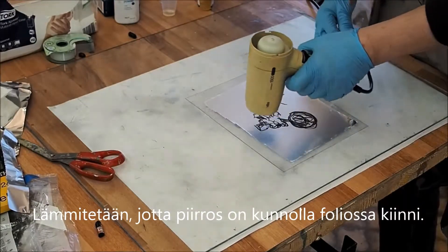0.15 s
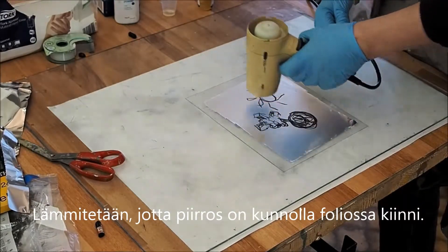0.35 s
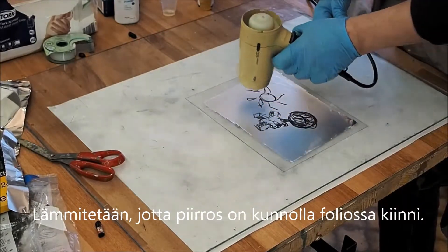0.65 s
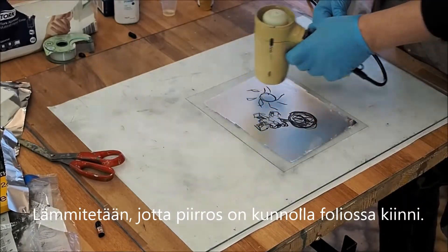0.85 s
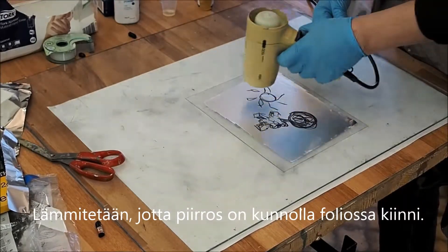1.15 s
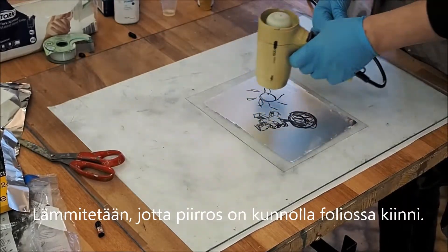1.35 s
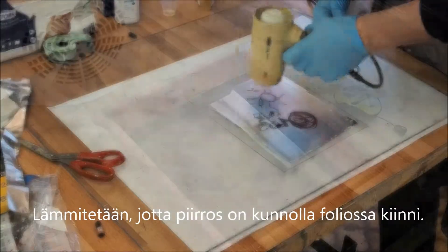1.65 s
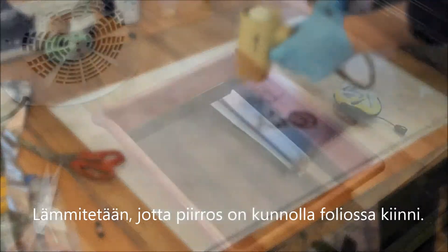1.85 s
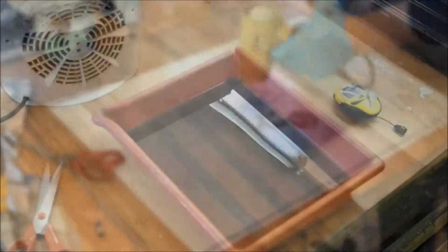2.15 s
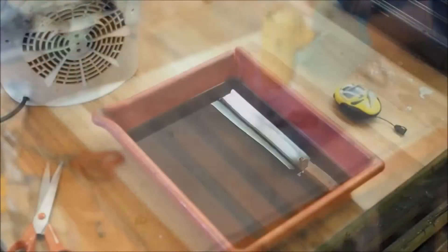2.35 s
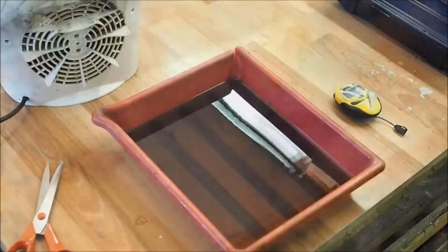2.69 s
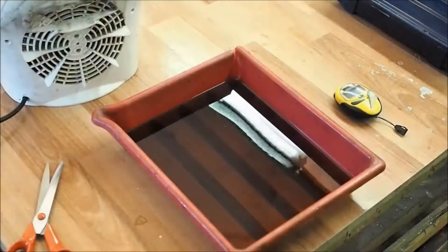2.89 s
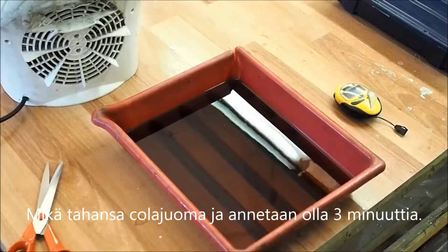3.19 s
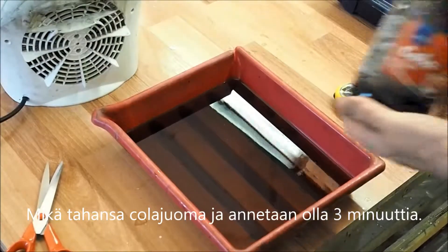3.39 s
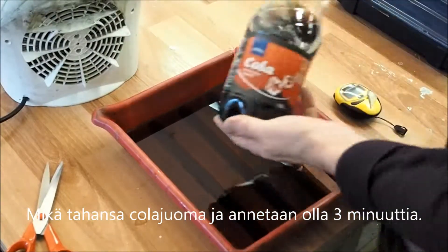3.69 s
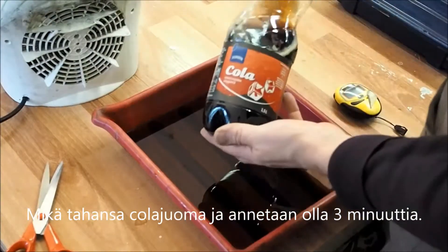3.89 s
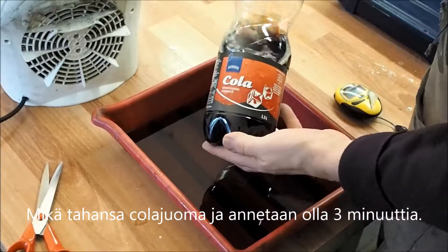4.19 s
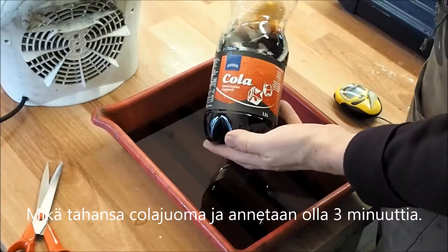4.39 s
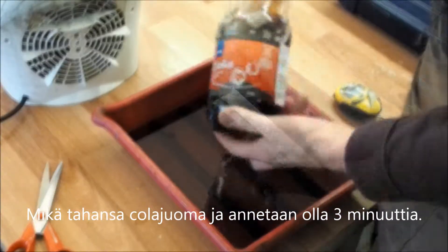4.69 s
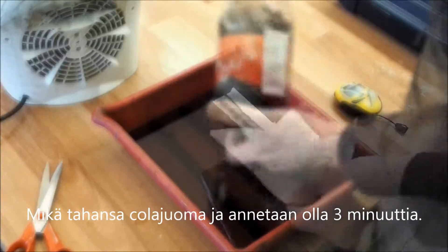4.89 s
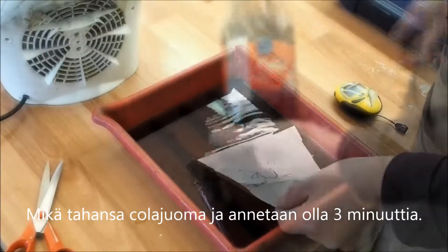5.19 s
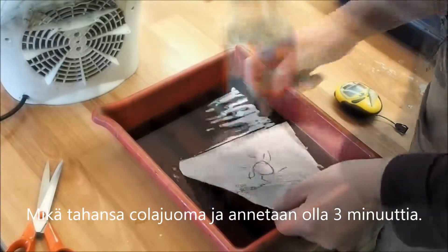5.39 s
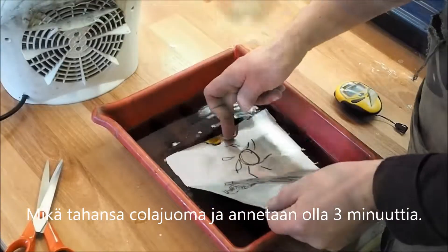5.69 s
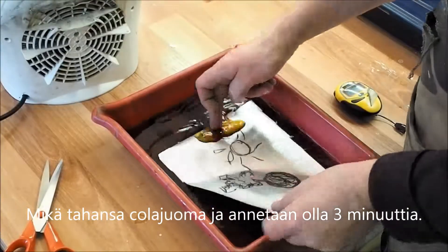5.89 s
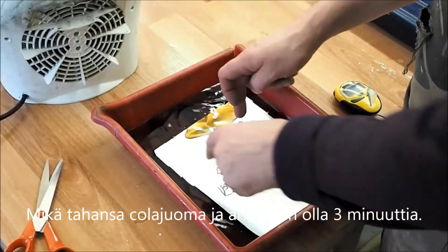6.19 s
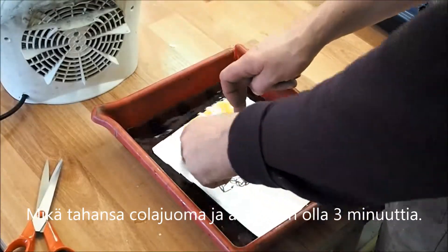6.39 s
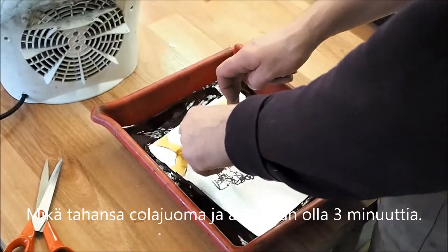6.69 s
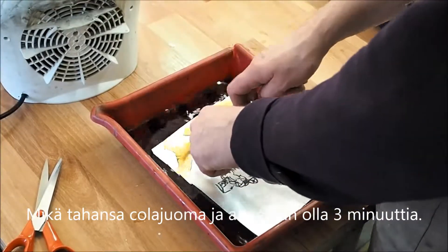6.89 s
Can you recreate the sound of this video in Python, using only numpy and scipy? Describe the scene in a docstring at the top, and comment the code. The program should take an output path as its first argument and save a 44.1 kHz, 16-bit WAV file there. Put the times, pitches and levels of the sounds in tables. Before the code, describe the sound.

Rushing hot air and fan whine fade away over three seconds, leaving quiet workshop handling: sleeve swish, bottle knock, tray taps and crackling foil.

```python
"""A rush of air with a fan whine: a small hair dryer is waved over foil on a workbench and fades away.
Then a plastic bottle is brought over a shallow tray with a swish of sleeve and put down, and the foil is
pushed into the liquid: soft bumps, a few knocks and thin crinkles in a small workshop.
Air, cloth, foil and room are coloured noise; the seven-blade fan is a set of lines locked to its shaft.
Knocks are ringing modes with a short noisy crack, and bumps are short bursts of filtered noise."""
import sys
import numpy as np
from scipy import signal
from scipy.fft import rfft, irfft
from scipy.io import wavfile

SR = 44100
rng = np.random.default_rng(int(sys.argv[2]) if len(sys.argv) > 2 else 0)


def log_audio(samples):
    """Write samples as a 16-bit WAV file to the path given in sys.argv[1]."""
    # one column per channel
    frames = np.atleast_2d(samples).T
    # limit to full scale, then quantise
    limited = np.clip(frames, -1, 1)
    pcm = np.round(limited * 32767).astype(np.int16)
    wavfile.write(sys.argv[1], SR, pcm)


N = 310905                                              # length in samples, about 7 s
TIME = np.arange(N) / SR                                # seconds
BINS = np.maximum(np.arange(N // 2 + 1) * SR / N, 1)    # spectrum frequencies in Hz, kept above zero

# Table levels are in dB; some functions add an overall level on top.


def from_db(db):
    """Turn decibels into a gain."""
    return 10 ** (np.asarray(db) / 20)


def rms_one(x):
    """Scale a signal to unit power."""
    return x / np.sqrt(np.mean(x ** 2) + 1e-20)


def in_time(rows):
    """Draw each column of a time table as a curve, with a value at every sample."""
    seconds, *columns = np.transpose(rows)
    return [np.interp(TIME, seconds, column) for column in columns]


def during(rows, fade):
    """One while a time table lasts, fading to zero outside it."""
    first, last = rows[0][0], rows[-1][0]
    return np.interp(TIME, [first - fade, first, last, last + fade], [0, 1, 1, 0])


def over_hz(points):
    """Draw a frequency table as a curve in dB, straight between points on a log frequency scale."""
    hz, db = np.transpose(points)
    return np.interp(np.log(BINS), np.log(hz), db)


def low_part(x, hz, order):
    """Keep what lies below a frequency, with a smooth edge."""
    return irfft(rfft(x) / (1 + (BINS / hz) ** order), N)


def drift(rate):
    """Random wandering with spread one; the rate in Hz sets how fast it wanders."""
    return rms_one(low_part(rng.standard_normal(N), rate, order=4))


def stereo_noise(colour_db, width, grain_db=0):
    """Coloured left and right noise with a unit-power middle; grain makes the noise's strength uneven."""
    sizes = from_db(grain_db * drift(580))
    white = rng.standard_normal((2, N)) * sizes
    colours = from_db([colour_db, colour_db + over_hz(width)])
    mid, side = irfft(rfft(white) * colours, N)
    return np.array([mid + side, mid - side]) / np.std(mid)


def decay(start, t60, rise):
    """A quick rise and an exponential fall that drops 60 dB in t60 seconds."""
    age = np.maximum(TIME - start, 0)
    return (1 - np.exp(-age / rise)) * from_db(-60 * np.minimum(age / t60, 4))


def ring(clicks, hz, t60):
    """A damped resonance: a unit click sets a fading sine ringing from height one."""
    radius = from_db(-60 / (t60 * SR))
    turn = 2 * np.pi * hz / SR
    feedback = [1, -2 * radius * np.cos(turn), radius * radius]
    return signal.lfilter([0, np.sin(turn)], feedback, clicks + 1e-18)


def strokes(rows, range_db=20):
    """Each stroke swells and dies evenly in dB, by range_db per rise or fall time; overlaps add in power."""
    power = np.zeros(N)
    for peak_s, db, rise, fall in rows:
        away = np.maximum((peak_s - TIME) / rise, (TIME - peak_s) / fall)
        power += from_db(db - range_db * np.minimum(away, 10)) ** 2
    return np.sqrt(power)


def placed(x, lag_s):
    """A source off to one side reaches the right channel a moment before the left."""
    half_turns = np.pi * BINS * lag_s * np.array([[-1], [1]])
    return irfft(rfft(x) * np.exp(1j * half_turns), N)


# How the workshop background rises under the fading dryer, then drops to a quieter room.
# Each row: time in seconds, rumble level in dB, hiss level in dB.
BACKGROUND_LEVELS = [(0, -76, -69), (1.6, -62, -65.5), (2.9, -48, -55), (3.95, -48.5, -53.5),
                     (4.4, -49, -58.5), (5.0, -49.5, -54), (5.28, -56, -64), (6.35, -57, -63),
                     (7.05, -54, -64.5)]
# Colour of the low room rumble. Each row: frequency in Hz, strength in dB per Hz.
RUMBLE_COLOUR = [(15, -40), (25, -14.5), (75, -3), (261, -2.5), (321, -4.5), (444, -8), (659, -6.5),
                 (796, -12.5), (994, -9.5), (1160, -17.5), (1310, -16.5), (1400, -44), (1500, -33),
                 (1950, -60), (3300, -120)]
# Colour of the room hiss. Each row: frequency in Hz, strength in dB per Hz.
HISS_COLOUR = [(700, -32), (1300, -12), (1700, 0), (2100, -6.5), (3600, -7), (4700, -12), (5500, -15),
               (10300, -15), (13000, -25), (16000, -30)]
# Stereo width of the room. Each row: frequency in Hz, side against middle in dB.
ROOM_STEREO = [(60, -5.5), (150, -6), (380, -8), (700, -6), (1300, -7), (2400, -4), (4400, -1.5),
               (8000, 1.5), (15000, -1)]


def background(rumble_db=-1.0, hiss_db=-0.5):
    """Room air as two layers of coloured noise, a low rumble and a faint hiss, each following its curve."""
    rumble, hiss = in_time(BACKGROUND_LEVELS)
    low = from_db(rumble + rumble_db) * stereo_noise(over_hz(RUMBLE_COLOUR), ROOM_STEREO)
    high = from_db(hiss + hiss_db) * stereo_noise(over_hz(HISS_COLOUR), ROOM_STEREO)
    return low + high


def workshop(x, t60, wall_hz, spread):
    """Diffuse reflections as a dying noise tail, dulled by the walls and mostly alike on both sides."""
    age = TIME[:SR // 2]
    after_gap = age > .003    # the first reflections come 3 ms late
    mid, side = rng.standard_normal((2, len(age))) * from_db(-60 * age / t60) * after_gap
    dulling = signal.butter(1, wall_hz, fs=SR, output="sos")
    tail = signal.sosfilt(dulling, [mid + spread * side, mid - spread * side])
    tail /= np.sqrt(np.sum(tail[0] ** 2))
    return signal.fftconvolve(x[None], tail, axes=1)[:, :N]


# Soft bumps on the bench.
# Each row: start in seconds, level in dB, centre in Hz, time to fall by 60 dB in seconds.
SOFT_BUMPS = [(1.993, -30.5, 133, 0.07), (2.691, -39.5, 516, 0.11), (2.835, -34.5, 660, 0.12),
              (2.84, -48, 280, 0.12), (3.06, -37.5, 527, 0.091), (3.105, -37, 442, 0.064),
              (3.111, -42, 159, 0.34), (3.1385, -40.5, 2100, 0.061), (3.14, -45, 650, 0.12),
              (3.355, -41, 216, 0.077), (3.43, -40, 110, 0.11), (3.514, -51, 204, 0.072),
              (4.627, -45, 402, 0.092), (4.863, -41, 175, 0.25), (4.864, -43.5, 640, .15),
              (4.922, -43, 153, 0.22), (5.49, -47.5, 910, .06), (5.542, -36.5, 320, 0.11),
              (5.593, -42, 2300, 0.067), (6.187, -48, 2600, .12), (6.228, -45.5, 272, 0.069)]


def bumps(width_ratio=1.37, rise=0.00085):
    """Soft contacts stir many damped modes around one pitch, made as short bursts of band-filtered noise."""
    out = np.zeros(N)
    for start, db, hz, t60 in SOFT_BUMPS:
        band = signal.butter(2, [hz / width_ratio, hz * width_ratio], "band", fs=SR, output="sos")
        shape = decay(start, t60, rise)
        thud = signal.sosfilt(band, rng.standard_normal(N) * shape + 1e-18)
        # the filtered thud gets back the power of its shape
        out += from_db(db) * rms_one(thud) * np.sqrt(np.mean(shape ** 2))
    return out


def knocks(hits, modes, crack_db, crack_t60, crack_hz, low_hz=300):
    """Each blow rings the body's modes and starts with a short noisy crack from low_hz to crack_hz."""
    clicks, burst = np.zeros(N), np.zeros(N)
    for start, db in hits:
        clicks[round(start * SR)] = from_db(db)
        burst += from_db(db + crack_db) * decay(start, crack_t60, rise=.0001)
    band = signal.butter(2, [low_hz, crack_hz], "band", fs=SR, output="sos")
    out = signal.sosfilt(band, burst * rng.standard_normal(N) + 1e-18)
    for k, (hz, db, t60) in enumerate(modes):
        sign = (-1) ** k    # neighbouring modes start in opposite directions
        out += sign * from_db(db) * ring(clicks, hz, t60)
    return out


# Taps on the bottle. Each row: start in seconds, level in dB.
TAPS_ON_BOTTLE = [(3.2991, -26.5), (3.3043, -36)]
# How the bottle rings. Each row: frequency in Hz, level in dB, time to fall by 60 dB in seconds.
BOTTLE_MODES = [(297.6, -12, 0.065), (570, -1.5, 0.041), (730, 2.5, 0.022), (990, -5, 0.035),
                (1450, -4, 0.013), (1940, -3, 0.017), (2200, -7, 0.018), (2800, -0.5, 0.019),
                (3380, -8, .025), (3680, -16, .02), (4900, -24, .015)]


def bottle_taps():
    """A tap on the plastic bottle rings its short-lived modes."""
    hit = knocks(TAPS_ON_BOTTLE, BOTTLE_MODES, crack_db=0, crack_t60=0.032, crack_hz=3000)
    return placed(hit, lag_s=.00002)


# The bottle set down on the bench. Each row: start in seconds, level in dB.
KNOCKS_ON_BENCH = [(4.919, -25), (4.9218, -40), (4.9255, -39)]
# How the bench rings. Each row: frequency in Hz, level in dB, time to fall by 60 dB in seconds.
BENCH_MODES = [(194, -7, 0.16), (260, -7, 0.069), (415, -7.5, 0.05), (625, 1, 0.04), (825, -1.5, 0.055),
               (1030, -18, 0.051), (1300, -3, 0.076), (1670, -8, 0.039), (2180, -6.5, 0.028),
               (2770, -6, .028), (4320, -10, 0.024), (6450, -9, 0.014), (7600, -4, 0.011), (9500, 4, 0.01),
               (10800, -7, .018)]


def bench_knocks():
    """The bottle's landing rings the bench, with a bright crack of contact."""
    hit = knocks(KNOCKS_ON_BENCH, BENCH_MODES, crack_db=2, crack_t60=0.021, crack_hz=12000)
    return placed(hit, lag_s=.000012)


# The tray nudged. Each row: start in seconds, level in dB.
KNOCKS_ON_TRAY = [(5.539, -30.5), (5.5455, -39.5), (5.5925, -41), (5.5962, -57), (5.604, -43.5)]
# How the tray rings. Each row: frequency in Hz, level in dB, time to fall by 60 dB in seconds.
TRAY_MODES = [(162, -10.5, 0.12), (306, -5.5, 0.042), (475, -2.5, .06), (573, -2, 0.051), (808, 3.5, 0.044),
              (910, 7.5, 0.032), (1096, 0, 0.042), (1450, -28, 0.035), (2160, -3.5, 0.021),
              (2880, -23, .03), (3760, -10, .025)]


def tray_knocks():
    """Nudges ring the tray, with a dull crack of contact."""
    hit = knocks(KNOCKS_ON_TRAY, TRAY_MODES, crack_db=8.5, crack_t60=0.041, crack_hz=1800)
    return placed(hit, lag_s=.000012)


# Fingers and sleeve rubbing at the tray.
# Each row: peak in seconds, level in dB, rise in seconds, fall in seconds.
TRAY_RUBS = [(3.22, -53.5, .17, .18), (4.63, -54, 0.066, 0.14), (4.97, -57.5, .2, .25),
             (5.6, -48.5, .04, 0.14), (5.78, -55, 0.087, 0.28), (5.87, -55.5, .05, 0.2),
             (6.05, -57, 0.16, 0.16), (6.2, -53, .05, 0.26), (6.6, -51.5, 0.13, 0.52),
             (7.04, -50.5, 0.1, .2)]
# Colour of the rubbing. Each row: frequency in Hz, strength in dB per Hz.
RUB_COLOUR = [(200, -29), (480, -7), (680, -1), (850, -4), (1300, -4.5), (1700, -0.5), (2100, -7),
              (3800, -8.5), (5500, -18.5), (10000, -29), (16000, -42)]
# Stereo width of the rubbing, and of the foil below. Each row: frequency in Hz, side against middle in dB.
FOIL_STEREO = [(1200, -33), (2500, -27), (4400, -10), (8000, -7), (15000, -6)]


def rubbing(level_db=0.0, uneven_db=1.8):
    """Dull friction, coloured by the tray: grainy noise whose strength wanders at random."""
    strength = strokes(TRAY_RUBS) * from_db(level_db + uneven_db * drift(30))
    return strength * stereo_noise(over_hz(RUB_COLOUR), FOIL_STEREO, grain_db=2.0)


# The sleeve brushing past. Each row: peak in seconds, level in dB, rise in seconds, fall in seconds.
SLEEVE_SWISHES = [(3.57, -50, 0.054, .3), (3.73, -38.5, 0.19, 0.18), (3.835, -38.5, .1, 0.14),
                  (3.878, -38.5, 0.14, 0.07), (3.95, -53, .1, .2)]
# Colour of the cloth. Each row: frequency in Hz, strength in dB per Hz.
CLOTH_COLOUR = [(350, -38), (600, -21), (717, -1), (790, -16), (846, -5), (1330, -8), (1660, -1.5),
                (2180, -3.5), (2720, 1), (4340, -1), (9490, -5), (14900, -17.5), (16000, -21)]
# Stereo width of the sleeve. Each row: frequency in Hz, side against middle in dB.
SLEEVE_STEREO = [(600, -9), (1400, -17), (2200, -16), (3200, -6), (5500, -3.5), (10000, 2), (15000, -1)]


def sleeve(level_db=0.0, catch_db=0.5):
    """Fibres catch and slip as the arm swings in: swelling noise with a slightly unsteady level."""
    strength = strokes(SLEEVE_SWISHES) * from_db(level_db + catch_db * drift(70))
    return strength * stereo_noise(over_hz(CLOTH_COLOUR), SLEEVE_STEREO, grain_db=0.5)


# The foil sliding and flexing.
# Each row: peak in seconds, level in dB, rise in seconds, fall in seconds, lift of the top treble in dB.
FOIL_SLIDES = [(2.76, -44, 0.14, 0.065, 3), (3.283, -50.5, 0.22, .08, 7), (3.39, -60, 0.037, .15, 7),
               (4.69, -43.5, .06, 0.042, 3.5), (5.0, -57, .25, 0.16, 0.5), (5.78, -50, 0.044, .04, -8),
               (5.875, -43.5, 0.064, 0.094, -5), (6.036, -38.5, 0.021, 0.12, 5.5),
               (6.125, -48.5, .08, 0.045, 3)]
# Foil snaps. Each row: start in seconds, level in dB, time to fall by 60 dB in seconds.
FOIL_SNAPS = [(3.139, -43.5, 0.087), (4.855, -49, .04), (5.062, -49, .05), (5.103, -51, .04),
              (5.36, -47, 0.064), (5.380, -45.5, 0.036), (5.504, -47, 0.054), (5.538, -35.5, .012),
              (5.574, -39.5, 0.098), (5.611, -39, 0.049), (5.758, -43, .04), (5.833, -50, .06),
              (5.861, -37.5, .07), (5.937, -47, .04), (6.026, -47, .14), (6.577, -52, 0.053)]
# Colour of the foil. Each row: frequency in Hz, strength in dB per Hz.
FOIL_COLOUR = [(700, -40), (1300, -22), (1700, -10), (2300, -7.5), (2900, -2), (3900, 0), (5500, -3),
               (8000, 0), (10300, 0), (12500, -8.5), (16000, -15.5)]


def foil(slide_db=0.0, snap_db=0.0, catch_db=1.5, sizzle_from_hz=8500):
    """Fine bright grains under each slide, and a short burst of them at each snap."""
    catching = from_db(slide_db + catch_db * drift(60))
    slide = catching * strokes([(s, db, rise, fall) for s, db, rise, fall, lift in FOIL_SLIDES])
    sizzle = catching * strokes([(s, db + lift, rise, fall) for s, db, rise, fall, lift in FOIL_SLIDES])
    snaps = sum(from_db(db + snap_db) * decay(s, t60, rise=0.0003) for s, db, t60 in FOIL_SNAPS)
    grains = stereo_noise(over_hz(FOIL_COLOUR), FOIL_STEREO, grain_db=1.0)
    body = low_part(grains, sizzle_from_hz, order=8)
    top_treble = grains - body
    # slides and snaps add in power
    return np.hypot(slide, snaps) * body + np.hypot(sizzle, snaps) * top_treble


def dryer_fade(fade_from_s=0.73, silent_at_s=2.976, bend=0.96):
    """Full strength at first, then an almost straight fade to silence (a bend of 1 is straight)."""
    left = (silent_at_s - TIME) / (silent_at_s - fade_from_s)
    return np.clip(left, 0, 1) ** bend


# Broad colour of the air stream. Each row: frequency in Hz, strength in dB per Hz.
AIR_COLOUR = [(30, -35), (100, -18.5), (190, -14.5), (330, -11.5), (560, -5), (1200, -1.5), (2200, -7),
              (3400, 0), (4900, -3), (5800, -7.5), (7000, -5.5), (10800, -8.5), (13200, -21),
              (16000, -24.5)]
# Resonances of the barrel and housing. Each row: frequency in Hz, width in Hz, lift in dB (minus is a dip).
BARREL_RESONANCES = [(264, 30.5, 12), (396.6, 23, 8.5), (526.3, 18.6, 8), (683.6, 21, 7), (820, 15, -1.5),
                     (910, 41, 10), (1026, 69, 8.5), (1360, 150, -6), (1643, 123, 3.5), (1840, 350, 5.5),
                     (2597, 256, 7.5), (2980, 240, 3)]
# Stereo width of the air stream. Each row: frequency in Hz, side against middle in dB.
DRYER_STEREO = [(60, -24), (190, -42), (280, -47), (400, -60), (550, -24), (750, -26.5), (1150, -10),
                (1600, -14.5), (2150, -37), (2800, -13), (4400, -9), (8100, -8), (11000, -8), (14000, -51)]


def air_stream(rush_db=-21.5, roar_db=-21.0, hiss_db=-20.5, roar_from_hz=2100, hiss_from_hz=5600,
               flutter_db=.5, beam_db=0.75):
    """Turbulence coloured by the barrel; the higher bands also waver slowly at random."""
    colour = over_hz(AIR_COLOUR)
    for hz, width, lift_db in BARREL_RESONANCES:
        colour = colour + lift_db * np.exp(-2 * ((BINS - hz) / width) ** 2)
    air = stereo_noise(colour, DRYER_STEREO)
    rush = low_part(air, roar_from_hz, order=4)
    below_hiss = low_part(air, hiss_from_hz, order=4)
    beamed = (below_hiss - rush) * from_db(roar_db) + (air - below_hiss) * from_db(hiss_db)
    stream = rush * from_db(rush_db) + beamed * from_db(beam_db * drift(5.6))
    return stream * from_db(flutter_db * drift(38)) * dryer_fade()


# Fan speed. Each row: time in seconds, rate of blades passing in Hz.
FAN_SPEED = [(0, 1872.4), (1.4, 1872.0), (1.7, 1875.2), (3.0, 1875.2)]
# Level of the blade tone, wavering as it fades. Each row: time in seconds, level in dB.
BLADE_LEVEL = [(0.0, -25), (0.6, -23), (0.76, -31), (0.83, -27), (0.95, -30.5), (0.97, -25.5), (1.24, -28),
               (1.28, -31), (1.47, -28.5), (1.72, -34), (1.76, -29.5), (1.95, -31.5), (2.05, -39),
               (2.14, -33), (2.43, -39), (2.46, -34), (2.85, -47.5), (2.96, -61)]
# Level of its octave, fluttering unevenly as it fades. Each row: time in seconds, level in dB.
OCTAVE_LEVEL = [(0, -33), (0.15, -32.5), (0.55, -41), (0.93, -31.5), (1.2, -45), (1.33, -30), (1.48, -45),
                (1.65, -34.5), (1.85, -44), (1.99, -34.5), (2.08, -41), (2.52, -46), (2.65, -55),
                (2.76, -45.5), (2.96, -62)]
# Weaker motor lines. Each row: multiple of the shaft rate, level in dB against the motor level.
MOTOR_LINES = [(1, -23.5), (3, -15), (4, -14.5), (5, -16), (6, -20), (10, -12), (11, -19), (11.5, -11),
               (12.5, -14.5), (21, -12), (25, -16), (28, -32), (35, -16)]


def fan_whine(blade_db=1.0, octave_db=0.6, motor_db=-27.0, blades=7):
    """Lines locked to the turning shaft; shifting reflections make each one waver."""
    blade_hz, = in_time(FAN_SPEED)
    blade, = in_time(BLADE_LEVEL)
    octave, = in_time(OCTAVE_LEVEL)
    shaft = 2 * np.pi * np.cumsum(blade_hz) / SR / blades    # shaft angle in radians

    def line(multiple, level_db, scatter, spread):
        """One partial: the direct sound plus scattered paths, which differ between left and right."""
        paths = 1 + scatter * (drift(8.2) + 1j * drift(16))
        sides = spread * (drift(3.0) + 1j * drift(1.7)) * np.array([[1], [-1]])
        wave = np.real((paths + sides) * np.exp(1j * multiple * shaft))
        return np.sqrt(2) * from_db(level_db) * wave

    tones = line(blades, blade + blade_db, scatter=0.12, spread=0.079)
    tones += line(2 * blades, octave + octave_db, scatter=0.36, spread=0.22)
    motor = np.zeros((2, N))
    for multiple, db in MOTOR_LINES:
        motor += line(multiple, motor_db + db, scatter=0.31, spread=0.079 * min(multiple / blades, 1))
    return tones * during(BLADE_LEVEL, fade=.02) + motor * dryer_fade()


def scene():
    """Mix the dryer, the hand work and the room around them."""
    blows = bumps() + bottle_taps() + bench_knocks() + tray_knocks()
    rustle = sleeve() + foil() + rubbing()
    # the left channel of the hand work feeds the reflections
    into_room = from_db(-17.0) * blows[0] + from_db(-12.0) * rustle[0]
    room = workshop(into_room, t60=0.45, wall_hz=4935, spread=0.16)
    dryer = air_stream() + fan_whine()
    left_right = from_db([[.25], [-.25]])    # left a touch louder
    return (dryer + blows + rustle + room + background()) * left_right


def record(dry, cutoff_hz=16000):
    """Cut the top steeply, filtering forwards and backwards so that nothing is delayed."""
    return signal.sosfiltfilt(signal.ellip(10, .05, 60, cutoff_hz, fs=SR, output="sos"), dry)


dry = scene()
out = record(dry)
log_audio(out)
```